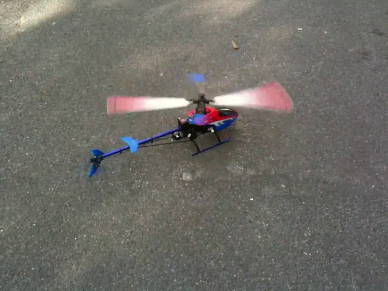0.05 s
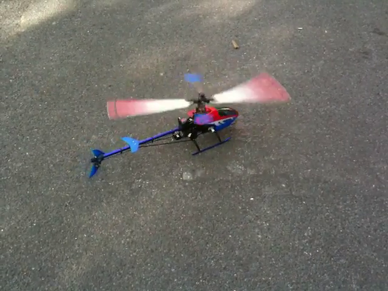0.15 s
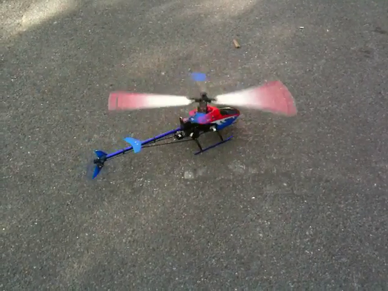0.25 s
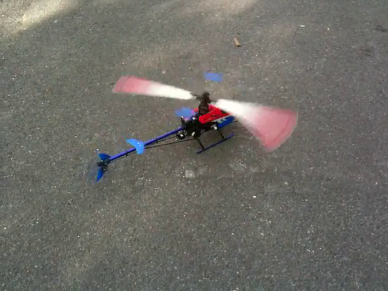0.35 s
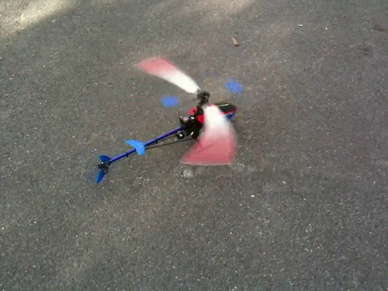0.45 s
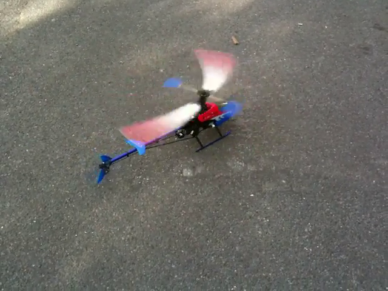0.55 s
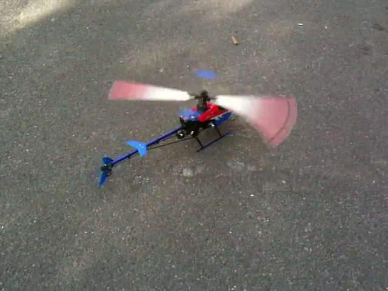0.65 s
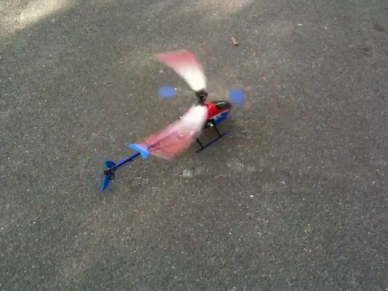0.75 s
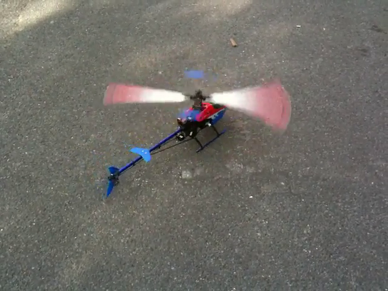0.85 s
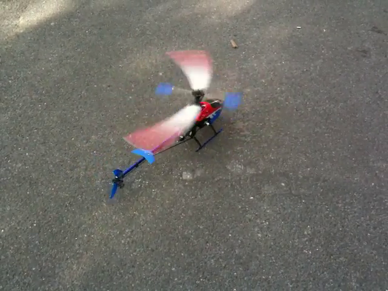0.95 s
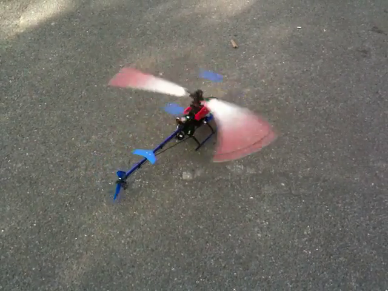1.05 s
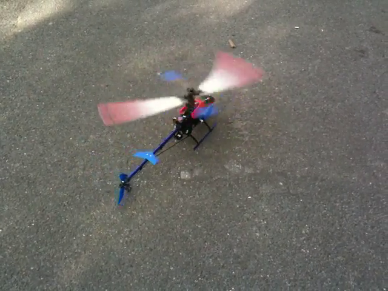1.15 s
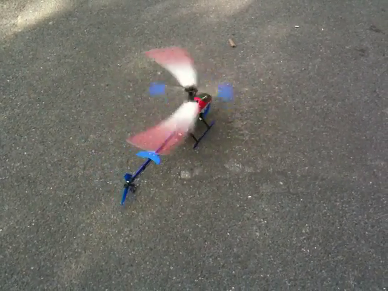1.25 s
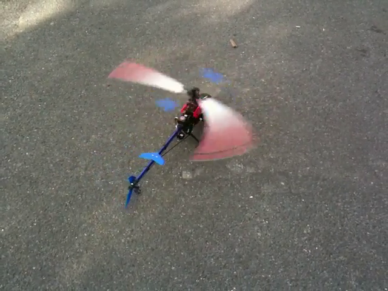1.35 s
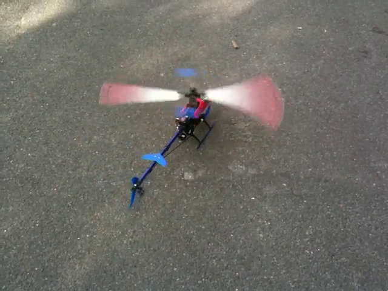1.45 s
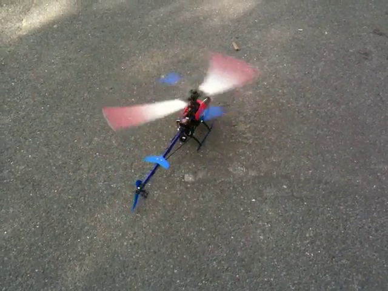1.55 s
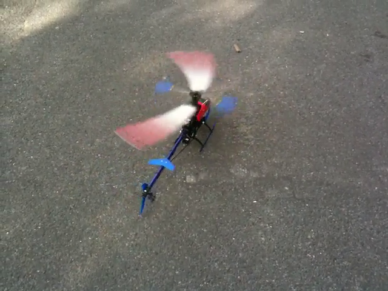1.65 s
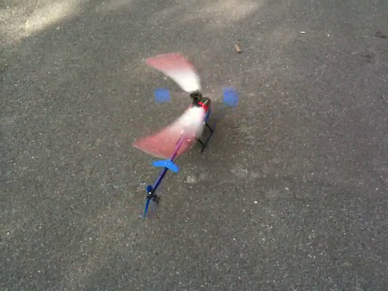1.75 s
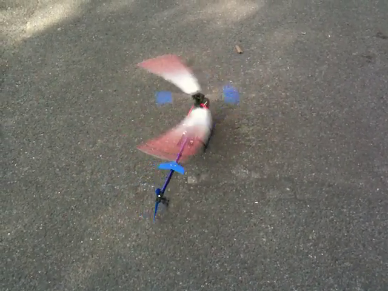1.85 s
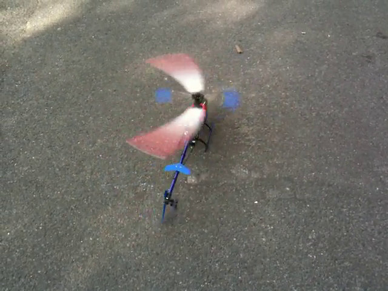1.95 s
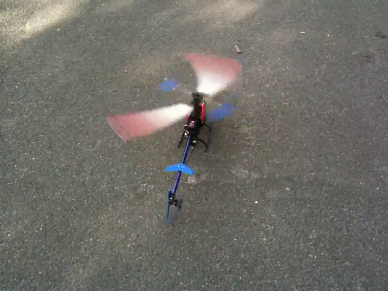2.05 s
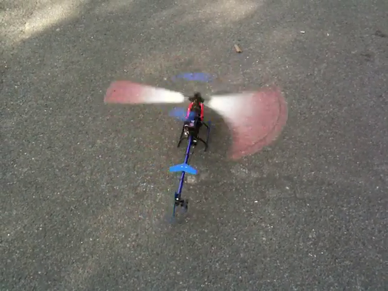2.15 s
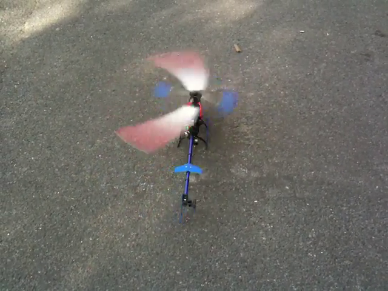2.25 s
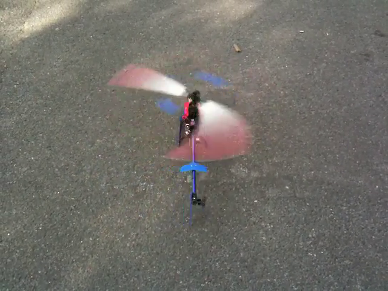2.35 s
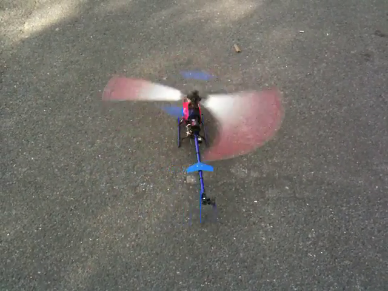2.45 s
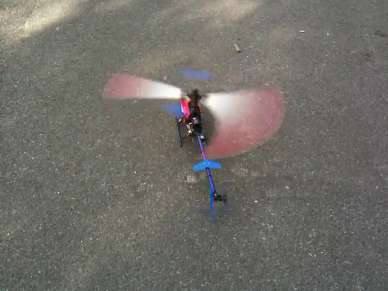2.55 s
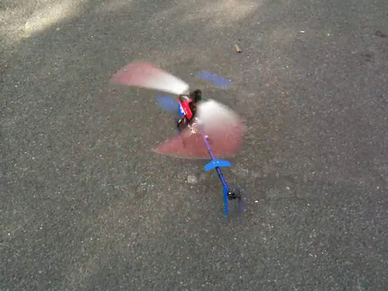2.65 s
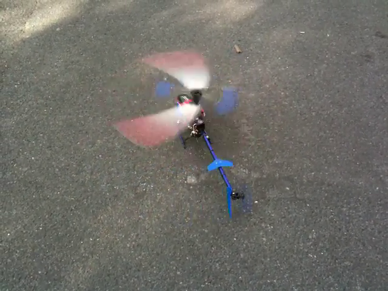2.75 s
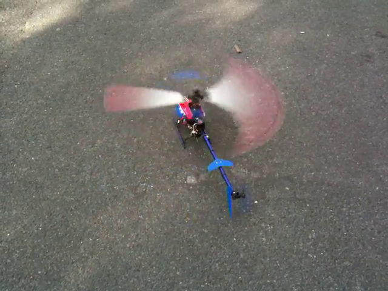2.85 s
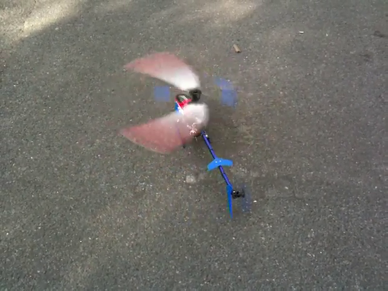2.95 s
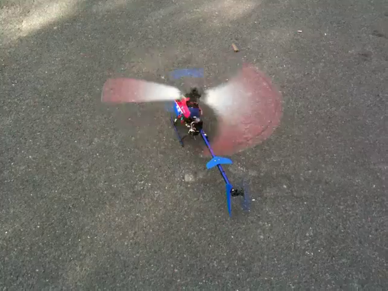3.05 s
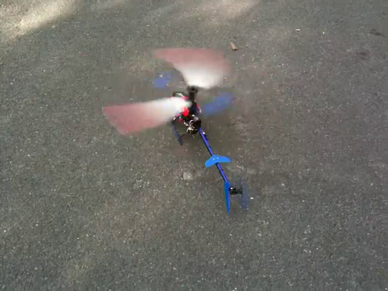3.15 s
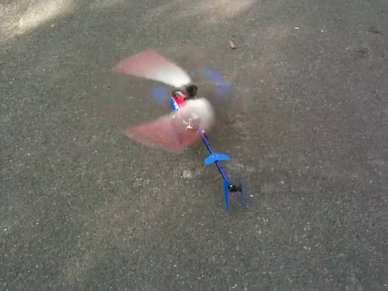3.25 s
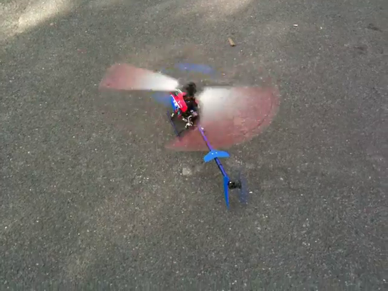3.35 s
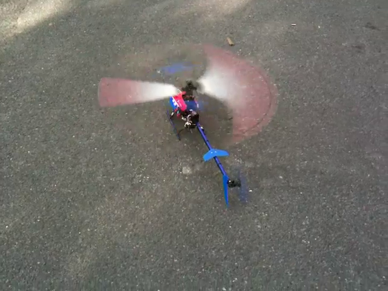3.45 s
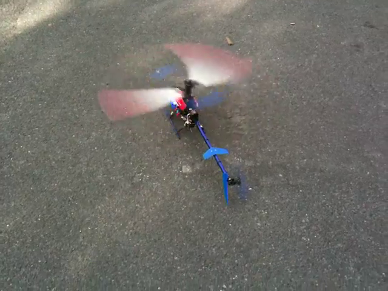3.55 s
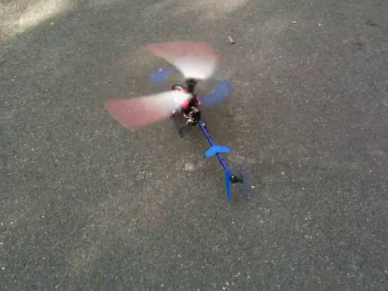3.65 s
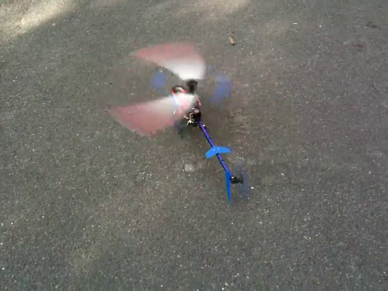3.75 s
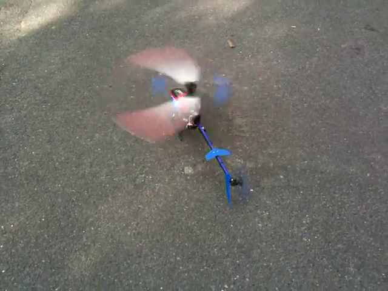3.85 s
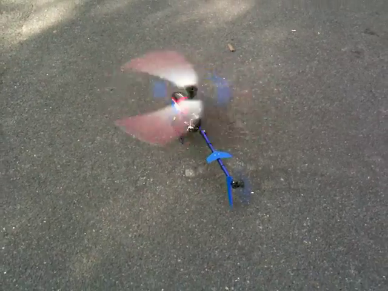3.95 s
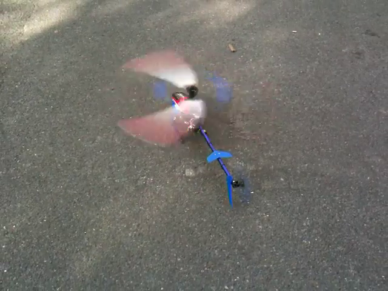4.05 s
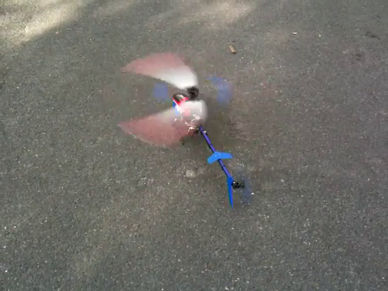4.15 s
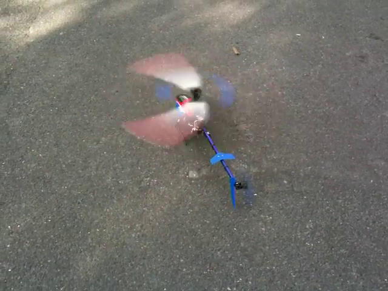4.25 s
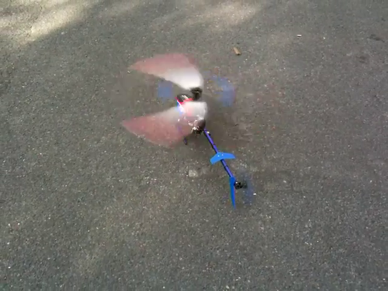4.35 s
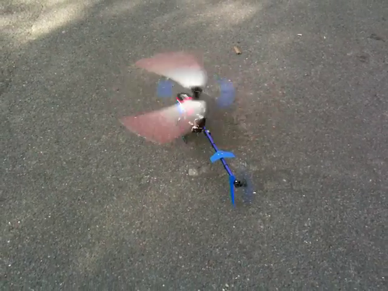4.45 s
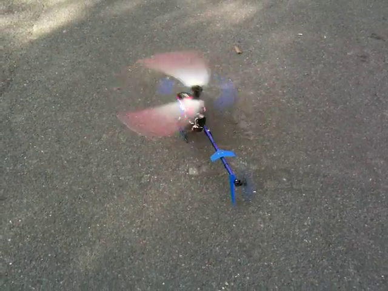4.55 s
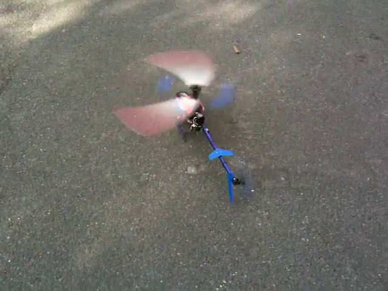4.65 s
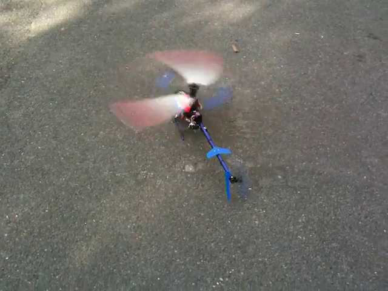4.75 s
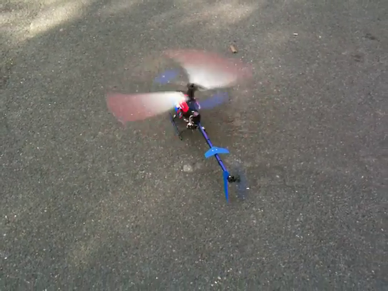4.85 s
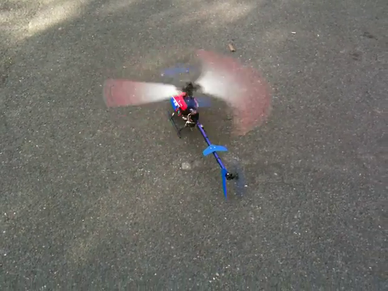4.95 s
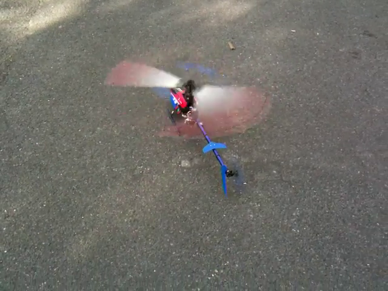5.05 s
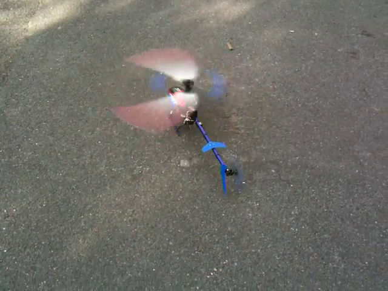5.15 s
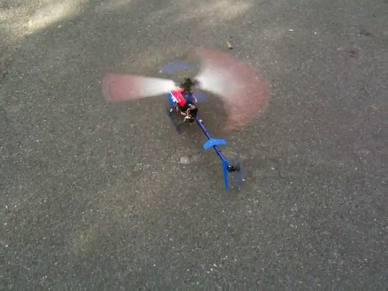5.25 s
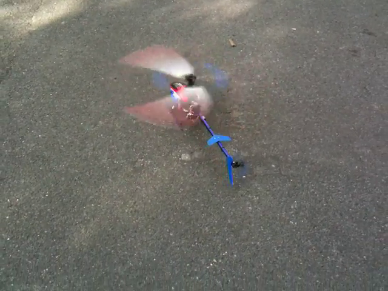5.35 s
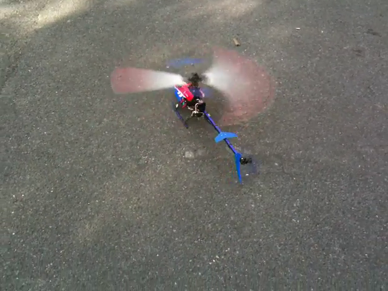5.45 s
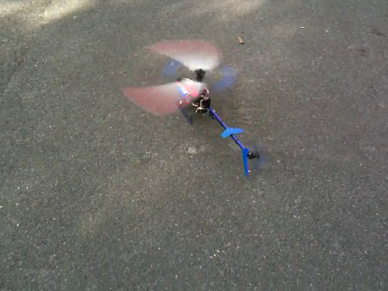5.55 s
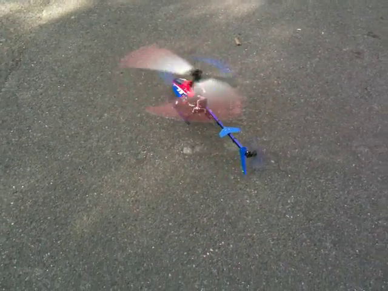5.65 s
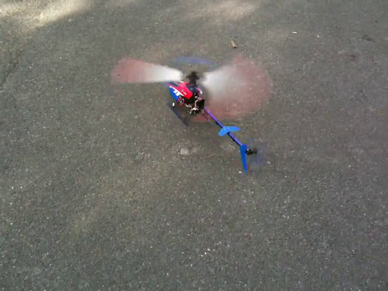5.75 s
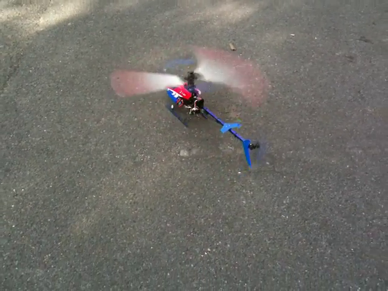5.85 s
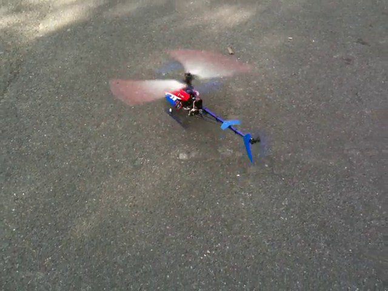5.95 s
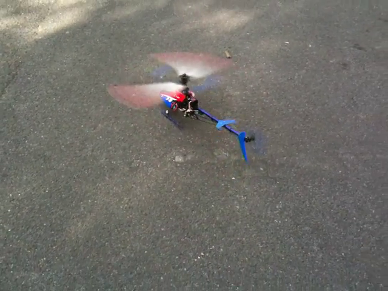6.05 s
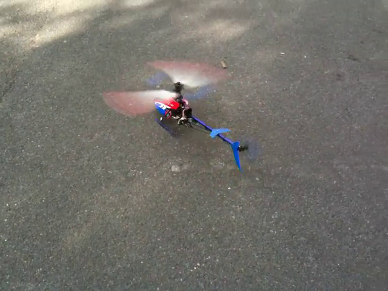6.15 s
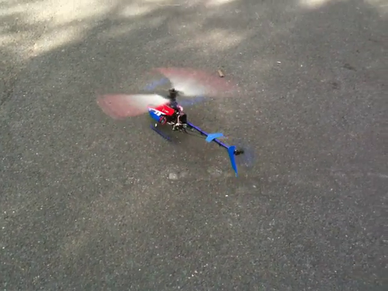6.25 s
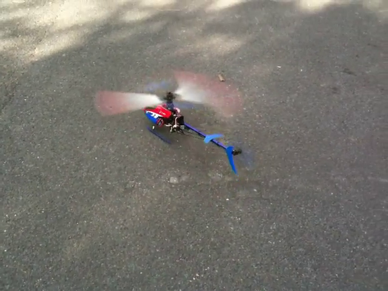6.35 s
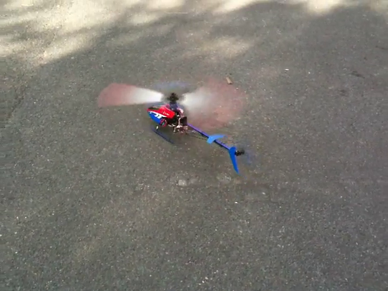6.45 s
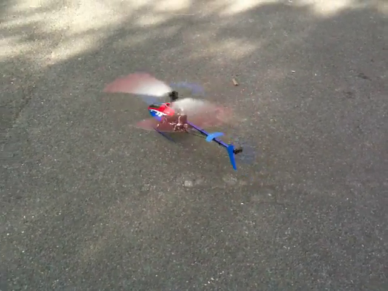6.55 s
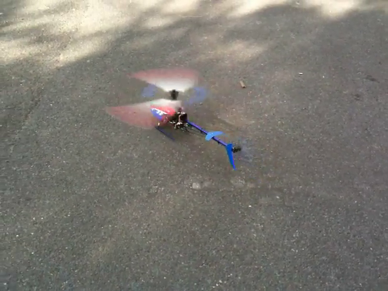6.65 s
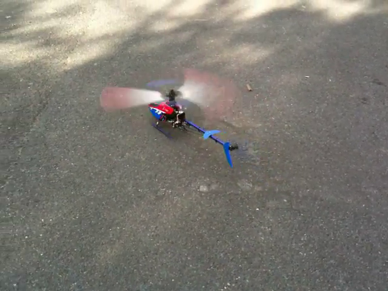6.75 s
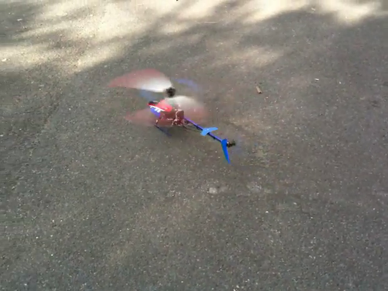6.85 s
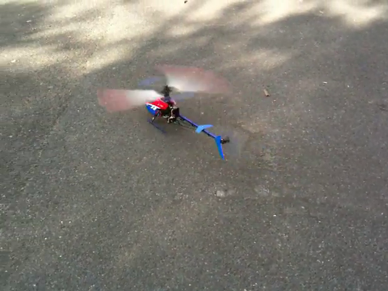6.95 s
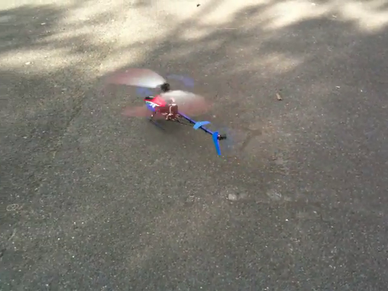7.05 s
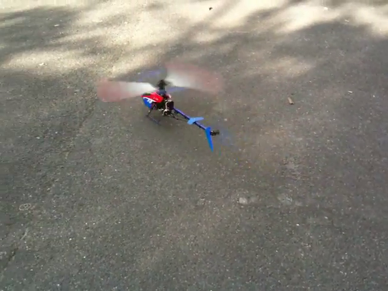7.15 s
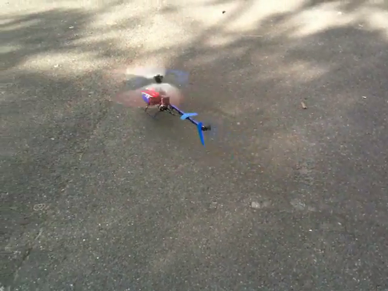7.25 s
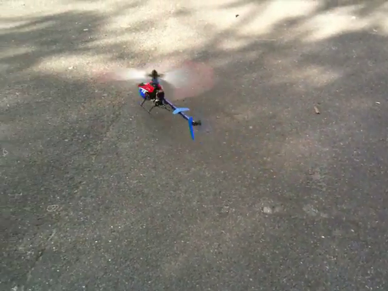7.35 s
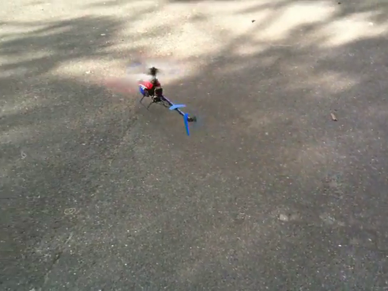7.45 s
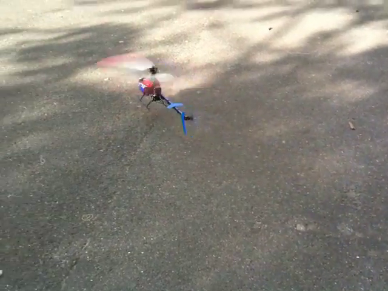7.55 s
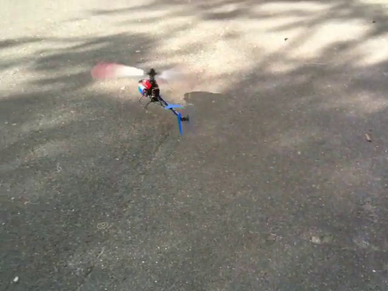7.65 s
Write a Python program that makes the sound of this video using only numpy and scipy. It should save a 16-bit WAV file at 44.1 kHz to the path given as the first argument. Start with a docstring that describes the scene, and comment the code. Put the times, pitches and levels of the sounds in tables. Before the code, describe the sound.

Rough, chattering gears of a model helicopter speed up into a piercing, hissing whine with fluttering blades, still rising as it lifts away.

```python
"""Model helicopter spooling up

A small electric helicopter spools up and flies off; a low rumble fades to near silence and returns.
The angle of the main rotor drives every moving part: the main gear whines and rattles the frame,
motor and tail rotor hum as harmonic stacks, and the blades swish as filtered noise.
The speed controller whistles faintly at two sidebands of its switching tone."""
import sys
import numpy as np
from scipy import signal
from scipy.fft import rfft, irfft, next_fast_len
from scipy.io import wavfile
from scipy.ndimage import map_coordinates

SR = 44100
rng = np.random.default_rng(int(sys.argv[2]) if len(sys.argv) > 2 else 0)


def transcribe(u):
    """Save the signal u as a 16-bit wav file named by the first command-line argument.

    u: samples, shape (n,) or (channels, n), limited to [-1, 1]; the rate is SR.
    q: integer samples, one column per channel.
    """
    v = np.clip(np.atleast_2d(u).T, -1, 1)
    q = np.round(v * 32767).astype(np.int16)
    wavfile.write(sys.argv[1], SR, q)


N = 339570


def amp(db):
    """Decibel law: level to amplitude gain."""
    return 10 ** (np.asarray(db) / 20)


def unit(x):
    """Normalisation: x at rms 1."""
    return x / np.sqrt(np.mean(x ** 2) + 1e-20)


def curves(rows):
    """Linear interpolation: one value per sample for each column after the time."""
    s, *columns = np.transpose(rows)
    t = np.arange(N) / SR
    return [np.interp(t, s, column) for column in columns]


def wobble(rate):
    """Band-limited fluctuation: a smooth curve through random knots, rate knots a second."""
    knots = rng.standard_normal(int(N * rate / SR) + 4)
    return map_coordinates(knots, [np.arange(N) * rate / SR])


def filtered(x, response):
    """Linear filtering: the spectrum of x times a response of frequency."""
    m = next_fast_len(N + SR // 4)
    spectrum = rfft(x, m) * response(np.fft.rfftfreq(m, 1 / SR))
    return irfft(spectrum, m)[:N]


def shaped(x, points):
    """Spectral shaping: x through (f/Hz, level/dB) points on a log frequency axis."""
    f, db = np.transpose(points)
    return filtered(x, lambda hz: amp(np.interp(np.log(hz + 1), np.log(f), db, left=-90, right=-90)))


def coloured(x, points):
    """Spectral shaping at fixed power: x through a spectrum, at rms 1."""
    return unit(shaped(x, points))


def noise(points):
    """Coloured noise: Gaussian noise of rms 1 with the given spectrum."""
    return coloured(rng.standard_normal(N), points)


def cycle(turns, peak=0):
    """Periodicity: a cosine that peaks at the given share of each turn."""
    return np.cos(2 * np.pi * (turns - peak))


def tone(turns, db):
    """Pure tone: a sinusoid with the given rms level."""
    return np.sqrt(2) * amp(db) * cycle(turns)


def fuzzy(turns, db, width_hz):
    """Narrow-band noise: random quadrature amplitudes smear a tone of the given rms level."""
    angle = 2 * np.pi * turns
    return amp(db) * unit(wobble(width_hz) * np.cos(angle) + wobble(width_hz) * np.sin(angle))


def level(speed, law):
    """Saturating power law: dB that grow with each doubling of speed, then level off."""
    full_db, grows_db, full_speed = law
    return full_db + grows_db * np.minimum(np.log2(speed / full_speed), 0)


def resonance(hz, modes):
    """Modal response: dB gained, or lost, by a gliding tone that passes (f/Hz, width/Hz, level/dB) modes."""
    return sum(db / (1 + (2 * (hz - centre) / width) ** 2) for centre, width, db in modes)


# low rumble: relative spectrum (f/Hz, level/dB) and set fade curve (t/s, level/dB)
RUMBLE_SPECTRUM = [(25, -24), (56, -13), (80, -10), (115, -6), (160, -1), (240, 4.5), (400, -25),
                   (900, -40)]
RUMBLE_FADE = [(0, -56), (1.4, -63.5), (2.1, -65), (2.5, -71), (4.4, -85), (5.8, -63), (7.7, -64)]


def low_rumble():
    """Coloured noise: a low rumble that a set curve fades to near silence around 4.4 s and up again."""
    return amp(curves(RUMBLE_FADE)[0] + 0.84 * wobble(6.8)) * noise(RUMBLE_SPECTRUM)


START_SPEED, INERTIA_S = 8.34, .3  # turns per second; time constant in s
# rotor speed that the throttle asks for (t/s, speed/turns per s)
THROTTLE = [(0.0, 10.01), (0.17, 11.34), (0.77, 13.17), (1.72, 14.64), (2.08, 17.74), (2.72, 23.06),
            (2.96, 23.68), (3.75, 24.92), (4.78, 25.45), (5.07, 27.42), (5.74, 29.78), (5.86, 29.52),
            (6.84, 32.83), (7.7, 33.67)]


def rotor_speed():
    """First-order lag: the heavy rotor follows the throttle late; turns per second."""
    step = 1 / (INERTIA_S * SR)
    asked = curves(THROTTLE)[0] - START_SPEED
    return START_SPEED + signal.lfilter([step], [1, step - 1], asked)


MOTOR_TURNS, POLE_PAIRS = 14, 3  # motor turns per rotor turn; magnet pole pairs
# controller whistle (t/s, inner sideband level/dB, outer sideband level/dB)
WHISTLE = [(0, -61, -55), (.6, -60, -61), (1.1, -83, -80), (1.5, -56, -68), (1.95, -48, -53),
           (2.3, -75, -66), (3, -75, -80)]


def controller(turns):
    """Modulation: lower sidebands of the switching tone sing in the windings and sink as the motor speeds up."""
    inner_db, outer_db = curves(WHISTLE)
    switching = 14340 * np.arange(N) / SR + .2 * wobble(200)  # 14340 Hz
    commutation = 2 * POLE_PAIRS * MOTOR_TURNS * turns
    inner = tone(switching - commutation, inner_db + 2 * wobble(51.5))
    outer = tone(switching - 2 * commutation, outer_db + 2 * wobble(50))
    return inner + outer


CRUISE = 25  # reference rotor speed, turns per second


def shaft_tones(turns, speed, ratio, tones, modes, grows_db):
    """Harmonic series: a geared shaft, louder with speed and shaped by the modes of its support."""
    out = np.zeros(N)
    for multiple, db, jitter, flutter_db in tones:
        k = ratio * multiple
        swell_db = grows_db * np.log2(speed / CRUISE) + resonance(k * speed, modes)
        out += tone(k * turns + jitter * wobble(40), db + swell_db + flutter_db * wobble(40))
    return out


TAIL_BLADES = 10  # tail blade passes per rotor turn
TAIL_GROWS_DB, MOTOR_GROWS_DB = 5, 6  # per doubling of speed
# shaft harmonics before resonance (multiple, level/dB at cruise, phase jitter/turns, flutter/dB)
TAIL_TONES = [(1, -66, 0.041, 1.5), (2, -72, .036, 3), (6, -69, .1, 1)]
MOTOR_TONES = [(1, -65, .0045, 0.35), (2, -78.5, .009, 1.4), (3, -71, .014, 2.9), (5, -59.5, 0.051, 2.3)]
# modes of the supports (f/Hz, width/Hz, level/dB)
TAIL_BOOM = [(190, 36, 1), (236, 30, 3), (313.5, 78, 10.5), (340, 10.5, -15), (635, 40, 12.5),
             (1150, 170, 12), (1601, 160, 19), (1990, 36, 15)]
MOTOR_MOUNT = [(296, 55, 7.5), (363.3, 63, 14), (426, 40, -8), (533, 68, 16.5), (720, 320, -9.5),
               (919, 236, 15), (1324, 290, 6.5), (1440, 110, 6.5), (1570, 82, 3.5), (1773, 39, 5.5),
               (2180, 560, -5.5)]


def shaft_hum(turns, speed):
    """Harmonic series: motor shaft and tail blades each give a short stack of tones."""
    tail = shaft_tones(turns, speed, TAIL_BLADES, TAIL_TONES, TAIL_BOOM, TAIL_GROWS_DB)
    motor = shaft_tones(turns, speed, MOTOR_TURNS, MOTOR_TONES, MOTOR_MOUNT, MOTOR_GROWS_DB)
    return tail + motor


SPOKES = 6  # of the main gear wheel
BLADE_PASS, BLADE_MISMATCH = 0.49, .4  # share of a turn; one blade swishes harder than the other
# reference level against speed (level/dB, growth/dB per doubling, full speed/turns per s)
WASH_LAW = (-41.5, 7.6, 21.5)
RATTLE_LAW = (-26, 11.84, 31.3)
# relative spectra of rushing air and of the slow and fast blade swish (f/Hz, level/dB)
WASH = [(30, -36), (60, -29), (110, -22), (150, -14.5), (200, -3.5), (300, -2), (430, -3.5), (800, -3),
        (1020, 0.5), (1400, -4.5), (2050, 2.5), (2600, -3.5), (3400, -5.5), (6000, -4)]
SWISH = [(2800, -7.5), (3400, -7.5), (3720, 4), (4050, -1), (5500, -5.5), (8000, -1.5), (10000, -29),
         (13000, -35)]
SWISH_FAST = [(2700, -53), (3500, -37), (4400, 5), (5400, 6.5), (6100, 4), (7000, -31), (10000, -2),
              (13000, -35)]


def rotor_wash(turns, speed, slack):
    """Turbulence noise: air rushes round the rotor and each of two blades swishes in passing."""
    wash_db = level(speed, WASH_LAW) - 2.5 + 0.56 * cycle(2 * turns, 0.055)
    wash = amp(wash_db) * noise(WASH)
    passing = (1 + cycle(2 * (turns - BLADE_PASS))) ** 1.3 * (1 + .2 * cycle(SPOKES * turns, .2))
    uneven = 1 + BLADE_MISMATCH * cycle(turns, BLADE_PASS)
    # the spectrum crosses over above 25 turns per second
    fast = np.clip((speed - 25) / 6.7, 0, 1)
    air = np.sqrt(1 - fast) * noise(SWISH) + np.sqrt(fast) * noise(SWISH_FAST)
    # a slack gear has no swish
    swish_gain = amp(level(speed, RATTLE_LAW) - 6.0) * np.clip(1 - 2.4 * slack, 0, 1)
    swish = swish_gain * unit(passing * uneven * amp(1.0 * wobble(60)) * air)
    return wash + swish


def tooth_load(turns, speed):
    """Periodic loading: wheel run-out, two blades and six spokes swing the tooth pressure."""
    spoke = SPOKES * turns
    flex = (speed / speed.max()) ** 2
    blades = .12 * cycle(2 * turns, .27) + .06 * cycle(4 * turns, .8)
    wheel = .07 * cycle(turns, .1) + .09 * cycle(spoke, .05) + .06 * cycle(2 * spoke, .6)
    return 1 + flex * (blades + wheel)


GEAR_TEETH = 140
# tight spots of the slack gear (share of a turn, relative strength)
KNOCKS = [(.225, 1.2), (.382, 2.6), (.53, 0.65), (.68, 0.72), (.88, 0.42)]
# reference level of the hiss (level/dB, growth/dB per doubling, full speed/turns per s)
HISS_LAW = (-37.5, 15.3, 24.7)
# relative spectra of the frame with slack and loaded gear, hiss and small metal part (f/Hz, level/dB)
FRAME_SLACK = [(2000, -92), (2900, -24), (3300, -6), (4400, -4), (5000, 1), (5600, 3), (6700, -2),
               (7400, 1), (8800, 1.5), (9450, 0.5), (10200, -6), (12500, -11), (15000, -50)]
FRAME_LOADED = [(2000, -19.5), (2900, -11), (3400, -1), (4300, 0), (5300, 0.5), (6000, 0.5), (6800, -2.5),
                (7600, -3.5), (8100, 1.5), (8650, -4), (9400, -0.5), (10200, -10.5), (13000, -26)]
HISS = [(5000, -20), (8500, -31), (10500, 5.5), (11800, -4.5), (13200, -4), (14500, -16), (15500, -8.5),
        (16000, -13)]
METAL = [(7500, -23), (8900, -9.5), (9350, -2), (9750, -10), (10400, -21), (13000, -21)]
# metal ring (t/s, level/dB)
RING = [(0, -69), (1.3, -45), (2.5, -38.5), (3.2, -36), (5, -58), (7.7, -32)]


def gear_rattle(turns, speed, load, slack):
    """Random impact excitation: uneven tooth strikes ring the frame, bunched at tight spots while slack."""
    knocks = np.zeros(N)
    for spot, size in KNOCKS:
        distance = (turns - spot + .5) % 1 - .5  # in turns
        knocks += size * np.exp(-.5 * (distance / 0.021) ** 2)
    knocks *= amp(0.7 * wobble(30.8))
    chatter = 0.35 * cycle(turns, 0.65) + 0.029 * cycle(2 * TAIL_BLADES * turns) + 0.7 * knocks
    force = load * (1 + slack * chatter) / (1 + 0.14 * slack) * amp(0.29 * wobble(14))
    grain = amp(1.25 * wobble(1500)) * (1 + 0.06 * cycle(GEAR_TEETH * turns))

    def strikes():
        return force * grain * rng.standard_normal(N)

    slack_frame = np.sqrt(slack) * amp(3.5) * coloured(strikes(), FRAME_SLACK)
    loaded_frame = np.sqrt(1 - slack) * amp(-1.0) * coloured(strikes(), FRAME_LOADED)
    frame = amp(level(speed, RATTLE_LAW)) * (slack_frame + loaded_frame)
    # the knocks also set a small metal part ringing
    ring_drive = 0.43 + np.sqrt(slack) * (1.0 * knocks + 0.27 * cycle(SPOKES * turns, 0.53))
    ring = amp(curves(RING)[0]) * unit(ring_drive * noise(METAL))
    hiss = amp(level(speed, HISS_LAW) - 3.0) * coloured(strikes(), HISS)
    return frame + ring + hiss


# frame radiation of gear tones: smooth trend (f/Hz, level/dB), resonances (f/Hz, width/Hz, level/dB)
FRAME_TREND = [(1150, -59), (2000, -55.5), (2900, -54.5), (3200, -43.5), (4000, -45), (4700, -37.5),
               (5900, -33.5), (6900, -40.5), (8600, -38), (10200, -40.5), (11400, -36), (14000, -49)]
FRAME_MODES = [(1874, 78, 6.5), (2480, 110, 13.5), (2710, 61, -24), (2810, 92, 11), (3915, 69, 4),
               (4240, 150, 7.5), (7390, 260, 11), (7980, 700, 8), (8880, 100, 8.5), (9267, 320, 15.5)]


def frame_response(hz):
    """Modal radiation: gain with which the frame radiates each frequency of the gear tones."""
    f, db = np.transpose(FRAME_TREND)
    return amp(np.interp(np.log(hz + 1), np.log(f), db) + resonance(hz, FRAME_MODES))


# moments when the blades take a bite of air and load the gear (t/s, half length/s, level/dB)
BITES = [(5.12, 0.1, 1.5), (7.283, 0.1, 4.5)]


def bite_db():
    """Load dependence: dB by which the whine swells while the blades load the gear."""
    t = np.arange(N) / SR
    return sum(db * np.exp(-((t - s) / half) ** 2) for s, half, db in BITES)


# sidebands of each gear tone: multiples of the spoke rate, and their level/dB at full speed
SIDEBANDS = (-2, -1, 1, 2)
SIDEBAND_DB = (-7, -10.5, -12, -13)


def spoke_split(mesh_turns, spoke, flex):
    """Periodic stiffness: every passing spoke stiffens the rim and splits a gear tone into sidebands."""
    sides = sum(amp(db) * cycle(mesh_turns + k * spoke + .05 * wobble(8))
                for k, db in zip(SIDEBANDS, SIDEBAND_DB))
    return cycle(mesh_turns) + flex * sides


# reference levels of tooth rate, octave and twelfth, before the frame
# (level/dB, growth/dB per doubling, full speed/turns per s)
MESH_LAWS = [(4.5, 3, 12), (-0.5, 44, 11.55), (-8, 8.3, 20.6)]
# tooth bounce (t/s, amount 0-1)
BLUR = [(0, 0.1), (2.1, 0.26), (2.7, .7), (4.8, 0.65), (5.1, 0.1), (6, 0.28), (7.2, 0.09)]
# multiples of the tooth rate that a slack gear adds
LOOSE_PARTIALS = (1.5, 2.5, 3, 4)


def gear_whine(turns, speed, slack):
    """Gear meshing: tooth-rate harmonics with sidebands from the uneven wheel, blurred by bouncing teeth."""
    first_db, second_db, third_db = (level(speed, law) for law in MESH_LAWS)
    blur, = curves(BLUR)
    spoke = SPOKES * turns
    flex = speed / speed.max()
    # the wheel runs truer the faster it spins
    runout = (1 - flex) * (0.24 * cycle(turns, 0.049) + 0.037 * cycle(2 * turns, 0.45))
    mesh = GEAR_TEETH * turns + runout + .022 * wobble(45) + .012 * wobble(400)
    press = 1 + flex * (.4 * cycle(spoke, .1) + .27 * cycle(2 * spoke, .6))
    bounce = np.sqrt(blur) * press

    first = amp(first_db - .5 + 1.8 * wobble(60)) * spoke_split(mesh, spoke, flex)
    first += bounce * fuzzy(mesh, first_db - 5.5, width_hz=200)
    second = np.sqrt(1 - blur) * amp(second_db + 4.0) * spoke_split(2 * mesh, spoke, flex)
    second += bounce * fuzzy(2 * mesh - turns, second_db - .5, width_hz=260)
    third = fuzzy(3 * mesh, third_db - 1.0 - 3 * slack, width_hz=200)
    fourth = fuzzy(4 * mesh, third_db - 10 + 7 * np.sqrt(slack), width_hz=560)
    tones = amp(bite_db()) * (first + second) + press * (third + fourth)

    # loose teeth add hoarse partials that swell as they sweep through the frame's resonances
    cluster = sum(fuzzy(k * mesh, 2 * wobble(7), width_hz=300) for k in LOOSE_PARTIALS)
    cluster_db = level(speed, RATTLE_LAW) - 15 + 11 * flex
    hoarse = amp(cluster_db) * np.sqrt(slack) * shaped(cluster, FRAME_SLACK)
    return filtered(tones, frame_response) + press * hoarse


# gear play (t/s, amount 0-1)
SLACK = [(0, 0.92), (1.85, 0.29), (2.3, 0.25), (2.9, 0.1), (3.3, 0.02)]
# loss with distance as it flies off at the end (t/s, level/dB)
FLIGHT = [(0, 0), (7.35, 0), (7.7, -2.5)]


def scene():
    """Superposition: all moving parts follow the main rotor's angle, over the rumble."""
    speed = rotor_speed()
    slack, = curves(SLACK)
    turns = np.cumsum(speed) / SR
    helicopter = controller(turns) + shaft_hum(turns, speed) + rotor_wash(turns, speed, slack)
    helicopter += gear_rattle(turns, speed, tooth_load(turns, speed), slack)
    helicopter += gear_whine(turns, speed, slack)
    mono = low_rumble() + amp(curves(FLIGHT)[0]) * helicopter
    return np.array([mono, mono])


TOP_HZ = 15850  # band limit


def record(dry):
    """Band limitation: two identical channels with nothing above the limit."""
    return np.array([filtered(side, lambda hz: hz < TOP_HZ) for side in dry])


dry = scene()
out = record(dry)
transcribe(out)
```